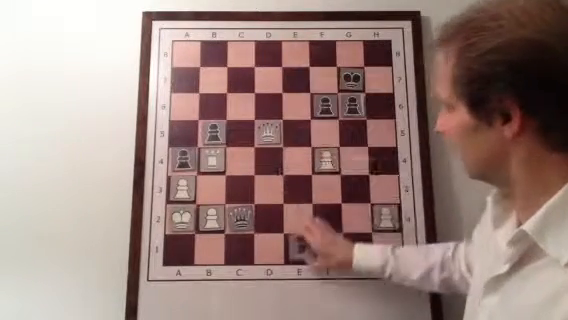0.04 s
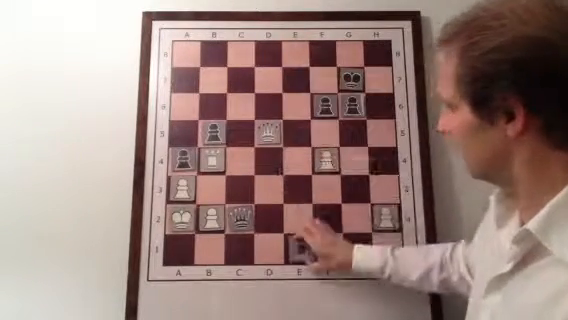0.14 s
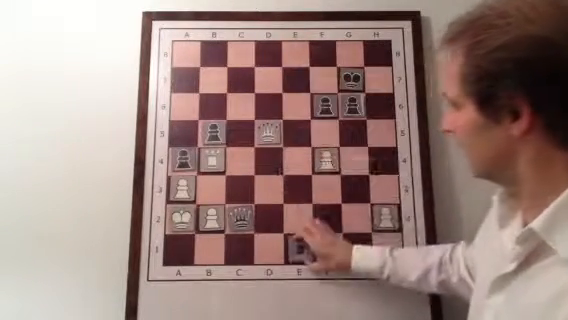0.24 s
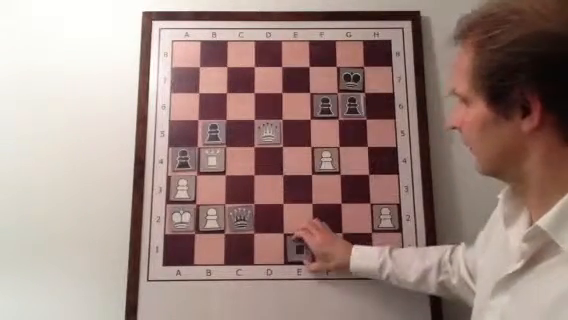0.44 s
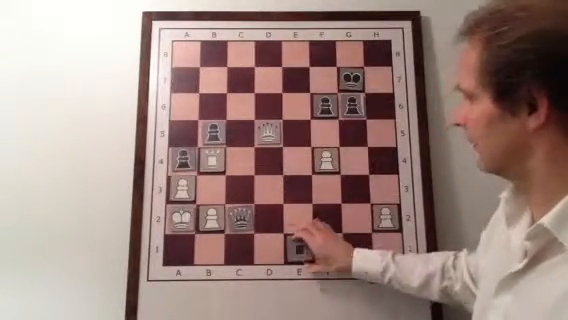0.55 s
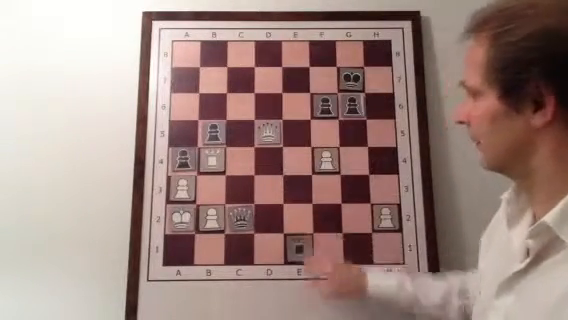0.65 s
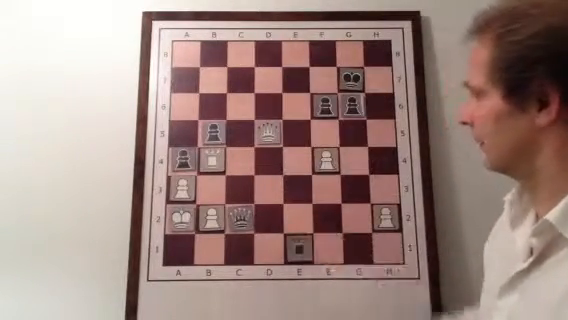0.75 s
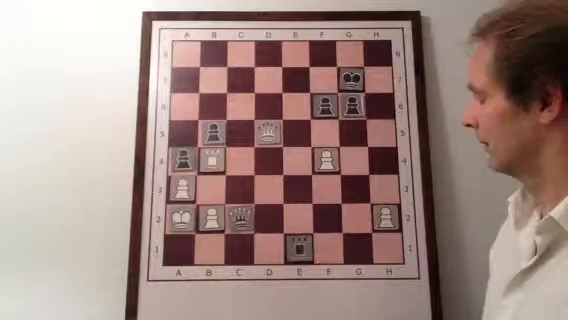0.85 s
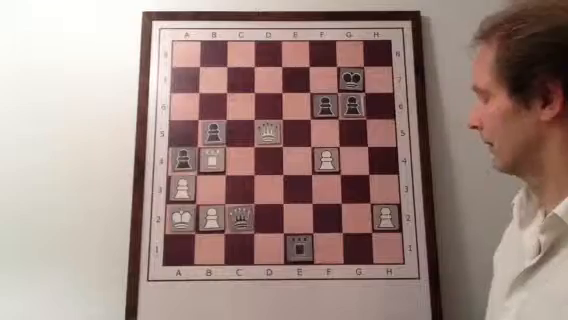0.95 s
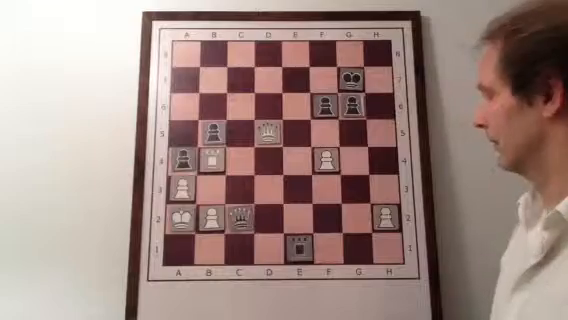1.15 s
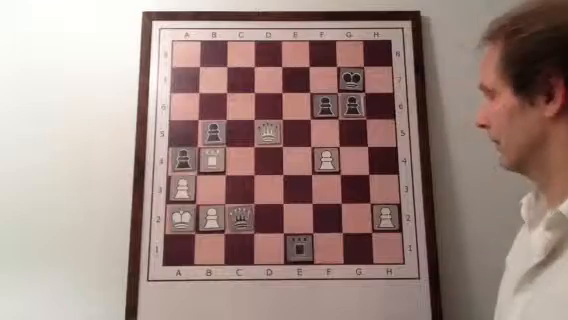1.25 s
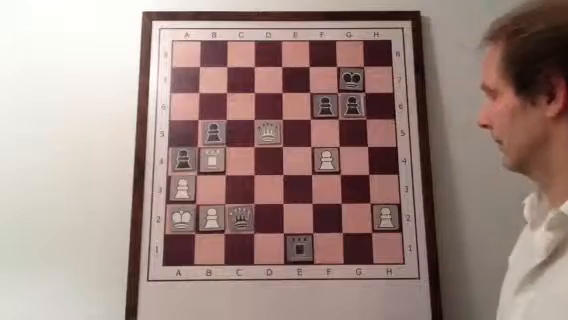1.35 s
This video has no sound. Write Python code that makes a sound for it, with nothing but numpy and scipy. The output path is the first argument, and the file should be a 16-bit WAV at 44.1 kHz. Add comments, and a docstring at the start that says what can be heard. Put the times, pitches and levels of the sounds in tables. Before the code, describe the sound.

A game piece snaps onto a hanging wall board at about 0.22 s: a hard, bright click with a short hollow thud, close echoes and a brief small-room tail. Fingers brush off softly near 0.4 s. At 0.57 s the board gives a muffled, fainter knock. Dull low bumps of shifting weight follow from 0.63 to 1.1 s, with faint rustles near 1.16 and 1.4 s, over low room tone and steady hiss.

```python
"""Chess piece on a wall board

In a small room, a flat magnetic piece snaps onto a demonstration board hanging on the wall.
Ringing modes and coloured noise make the piece click and the panel thud, with echoes and a room tail.
Fingers slide off as swells of noise, and the released board knocks softly back.
The player shifts away in dull low bumps and faint rustle, over room tone and microphone hiss."""
import sys
import numpy as np
from scipy import signal
from scipy.fft import rfft, irfft
from scipy.io import wavfile

SR = 44100
rng = np.random.default_rng(int(sys.argv[2]) if len(sys.argv) > 2 else 0)


def master_out(mix):
    """Clip the mix to full scale and print it as 16-bit PCM to the path in sys.argv[1]."""
    frames = np.transpose(np.atleast_2d(mix))
    ceiling = np.clip(frames, -1, 1)
    pcm = np.round(ceiling * 32767).astype(np.int16)
    wavfile.write(sys.argv[1], SR, pcm)


N = 61739
TIME = np.arange(N) / SR


def from_db(db):
    """Decibels to amplitude gain."""
    return 10 ** (np.asarray(db) / 20)


def at_hz(points, hz):
    """Read a table along a log-frequency axis, holding its end values."""
    knots, values = np.transpose(points)
    return np.interp(np.log(np.maximum(hz, 1)), np.log(knots), values)


def decay(t60_s):
    """Exponential envelope that loses 60 dB in t60_s."""
    return np.exp(-np.log(1000) * TIME / max(t60_s, 1e-3))


def swell(time_constant_s):
    """Envelope that rises smoothly from silence towards one."""
    return 1 - np.exp(-TIME / time_constant_s)


def noise(colour):
    """Random-phase noise of a given colour and rms 1, falling away below its lowest point."""
    hz = np.arange(N // 2 + 1) * SR / N
    low_rolloff = np.minimum(hz / colour[0][0], 1) ** 2
    gain = from_db(at_hz(colour, hz)) * low_rolloff
    random_phase = np.exp(2j * np.pi * rng.random(len(hz)))
    x = irfft(gain * random_phase, N)
    return x / x.std()


def delayed(x, delay_s):
    """The same sound, starting delay_s later."""
    silence = np.zeros(int(max(delay_s, 0) * SR))
    return np.concatenate([silence, x])[:N]


def filtered(x, order, corner_hz, kind):
    """Butterworth filter, low-pass or high-pass."""
    return signal.sosfilt(signal.butter(order, corner_hz, kind, fs=SR, output="sos"), x)


def ring(modes):
    """Struck modes: decaying sines of alternating sign."""
    total = np.zeros(N)
    for k, (hz, db, t60_s) in enumerate(modes):
        sign = (-1) ** k
        total += sign * from_db(db) * decay(t60_s) * np.sin(2 * np.pi * hz * TIME)
    return total


# Steady tone of the small room at the microphone. Each row: frequency in Hz, relative level in dB.
ROOM_TONE_COLOUR = [(25, -1), (60, -12), (86, -37), (98, -7), (125, -18.5), (165, -9), (215, 0.5),
                    (310, -4), (500, -11.5), (800, -16.5), (1500, -27), (3000, -30), (8000, -42)]
# Hiss of the microphone itself. Each row: frequency in Hz, relative level in dB.
HISS_COLOUR = [(100, 6.5), (2000, 0), (5000, -1.5), (10000, -3), (15000, -5)]
ROOM_TONE_DB, HISS_DB = -64, -66.5  # rms


def background():
    """Low room tone and microphone hiss, both steady coloured noise."""
    room_tone = from_db(ROOM_TONE_DB) * noise(ROOM_TONE_COLOUR)
    hiss = from_db(HISS_DB) * noise(HISS_COLOUR)
    return room_tone + hiss


# Dull bumps as the player shifts his weight. Each row: start in seconds, peak envelope in dB.
BUMPS = [(0.0, -55.5), (0.634, -53.5), (.68, -53.5), (0.743, -51.5), (0.826, -54), (.925, -60),
         (1.13, -64.5)]
# Their mostly low spectrum in the room. Each row: frequency in Hz, relative level in dB.
BUMP_COLOUR = [(145, -47), (178, -5.5), (215, 6.5), (290, -7.5), (480, -13), (620, -20), (820, -26.5),
               (1500, -30.5), (4000, -47.5)]
BUMP_ATTACK_S, BUMP_T60_S = 0.0062, 0.44  # attack is a time constant


def bumps():
    """Low noise whose bump envelopes rise fast, linger and overlap by adding their powers."""
    shape = swell(BUMP_ATTACK_S) * decay(BUMP_T60_S)
    shape = shape / shape.max()
    power = sum(delayed(from_db(db) * shape, start_s) ** 2 for start_s, db in BUMPS)
    return noise(BUMP_COLOUR) * np.sqrt(power)


# Brushes of fingers and sleeve.
# Each row: centre in seconds, width (standard deviation) in seconds, peak envelope in dB.
BRUSHES = [(.008, 0.0067, -66.5), (0.403, 0.023, -58), (.47, 0.024, -69.5), (0.586, 0.013, -62),
           (0.658, 0.052, -68.5), (1.163, 0.022, -67.5), (1.395, 0.01, -64)]
# Sound of sliding skin and cloth. Each row: frequency in Hz, relative level in dB.
BRUSH_COLOUR = [(200, -5), (500, -3), (900, -4.5), (1400, 3.5), (1900, -10.5), (2400, 0.5), (4000, -8.5),
                (7000, -15), (14000, -16.5)]


def brushes():
    """Skin and cloth slide: coloured noise in short, soft, bell-shaped swells."""
    envelope = np.zeros(N)
    for centre_s, width_s, db in BRUSHES:
        envelope += from_db(db) * np.exp(-0.5 * ((TIME - centre_s) / width_s) ** 2)
    return noise(BRUSH_COLOUR) * envelope


# Reverberation time of the small room. Each row: frequency in Hz, time to lose 60 dB in seconds.
ROOM_T60 = [(200, 0.63), (500, .55), (1500, 0.46), (3500, 0.61), (6000, 0.3), (14000, .35)]


def room_tail(colour, build_s):
    """Diffuse reverberation: noise that builds up, then dies at each band's own rate."""
    spectrum = rfft(noise(colour))
    hz = np.arange(N // 2 + 1) * SR / N
    centres_hz = np.geomspace(125, 16000, 8)
    tail = np.zeros(N)
    for centre_hz in centres_hz:
        # Neighbouring bands crossfade, so their weights always sum to one.
        band_weight = at_hz(np.c_[centres_hz, centres_hz == centre_hz], hz)
        band = irfft(spectrum * band_weight, N)
        tail += band * decay(at_hz(ROOM_T60, centre_hz))
    return tail * swell(build_s)


# Near reflections in the room.
# Each row: delay in seconds, click level in dB, thud level in dB, both relative to the direct sound.
ECHOES = [(.0104, -19, -32), (0.0161, -13, -1.5), (0.0333, -12, -12.5)]


def with_echoes(direct, level_column):
    """Add near reflections, plain delayed copies at the levels of one column."""
    return direct + sum(from_db(row[level_column]) * delayed(direct, row[0]) for row in ECHOES)


# First, heavily damped flexing of the panel.
# Each row: frequency in Hz, level in dB, time to lose 60 dB in seconds.
FLEX_MODES = [(254.3, -29.5, 0.079), (399, -25.5, 0.04)]
# Longer ringing of the panel. Each row: frequency in Hz, level in dB, time to lose 60 dB in seconds.
PANEL_MODES = [(223.4, -55, 1), (233.2, -43, 0.63), (307.3, -47, 0.49), (360, -43.5, 0.54),
               (418.7, -44.5, 0.4), (472.3, -46.5, 0.32), (498, -49, 0.55), (770.6, -44, 0.52),
               (842, -39.5, 0.51), (1064, -47, 0.41)]
# Thud as the room returns it. Each row: frequency in Hz, relative level in dB.
THUD_ROOM_COLOUR = [(150, -39), (210, 1.5), (330, -7.5), (490, -3.5), (620, -13), (800, -4.5), (1080, -10),
                    (1400, -27), (2000, -42)]
THUD_ROOM_DB = -38.5
MISSED_Q = 2.15  # sharpness of the gap around the missed pitch


def panel_thud(swell_s, low_hz, high_hz, missed_hz):
    """The panel flexes and booms; each blow sets the swell, the band excited and a gap in it."""
    flex = with_echoes(ring(FLEX_MODES), level_column=2)
    room = from_db(THUD_ROOM_DB) * room_tail(THUD_ROOM_COLOUR, build_s=0.012)
    thud = (flex + ring(PANEL_MODES) + room) * swell(swell_s)
    thud = filtered(thud, 2, low_hz, "high")
    thud = signal.lfilter(*signal.iirnotch(missed_hz, MISSED_Q, fs=SR), thud)
    return filtered(thud, 6, high_hz, "low")


# First hard crack of a contact.
# Each row: frequency in Hz, level in dB, time to lose 60 dB in seconds.
CRACK_MODES = [(3365, -26, 0.021), (3830, -31, 0.012), (4490, -31.5, 0.023)]
# Ringing of the piece. Each row: frequency in Hz, level in dB, time to lose 60 dB in seconds.
PIECE_MODES = [(1866, -51.5, 0.2), (2243, -51.5, .3), (2320, -50, 0.15), (3084, -49, 0.34),
               (3310, -46, 0.3), (3330, -46.5, 0.39), (3572, -41, 0.16), (3523, -41.5, 0.24),
               (3680, -37.5, 0.13), (4060, -52, 0.084), (4493, -39, 0.11)]
# Dense, quickly damped modes of piece and panel. Each row: frequency in Hz, relative level in dB.
CLICK_COLOUR = [(1000, -30), (1600, -26), (2250, -13), (2800, -11), (3400, -0.5), (4500, -1), (6000, -13),
                (8000, -23), (15000, -32)]
# Click as the room returns it. Each row: frequency in Hz, relative level in dB.
CLICK_ROOM_COLOUR = [(1080, -9), (1350, -17), (1700, -12.5), (2300, -6.5), (2800, -11.5), (3500, 0),
                     (4600, -6), (6000, -13.5), (8000, -19.5), (15000, -32.5)]
CLICK_DB, CLICK_T60_S, CLICK_ROOM_DB = -35, 0.11, -41


def piece_click():
    """The piece cracks against the board: brief modes, ringing and decaying noise for dense modes."""
    crack = ring(CRACK_MODES) * (1 - decay(0.003))  # softened onset
    crack = with_echoes(crack, level_column=1)
    dense_modes = from_db(CLICK_DB) * noise(CLICK_COLOUR) * decay(CLICK_T60_S)
    room = from_db(CLICK_ROOM_DB) * room_tail(CLICK_ROOM_COLOUR, build_s=0.0027)
    return crack + ring(PIECE_MODES) + dense_modes + room


# The snap onto the wall board, then the soft knock back.
# Each row: start in seconds, gain of the piece's click in dB, gain of the panel's thud in dB,
# time constant of the thud's swell in seconds, then lowest, highest and missed pitch of the panel in Hz.
CONTACTS = [(0.2237, 0, -0.5, 0.00085, 137, 2970, 912), (0.5704, -26, -4.5, 0.0054, 331, 551, 298)]


def contacts():
    """Each contact sounds piece and panel together."""
    total = np.zeros(N)
    for start_s, click_db, thud_db, *blow in CONTACTS:
        click = from_db(click_db) * piece_click()
        thud = from_db(thud_db) * panel_thud(*blow)
        total += delayed(click + thud, start_s)
    return total


def scene():
    """Everything in the small room at one microphone, as a single channel."""
    return (background() + bumps() + brushes() + contacts())[None]


CUTOFF_HZ = 15350


def record(dry):
    """The recorder thins the deep bass and cuts the top steeply."""
    thin = filtered(dry, 4, 90, "high")
    top_cut = signal.ellip(12, 0.1, 70, CUTOFF_HZ, fs=SR, output="sos")
    return signal.sosfilt(top_cut, thin)


dry = scene()
out = record(dry)
master_out(out)
```